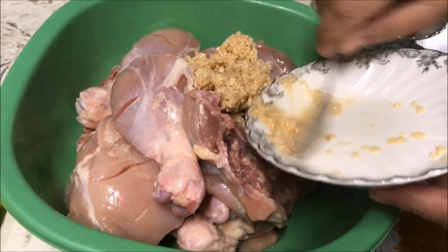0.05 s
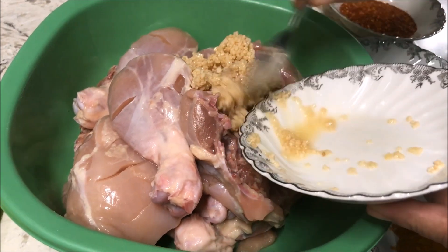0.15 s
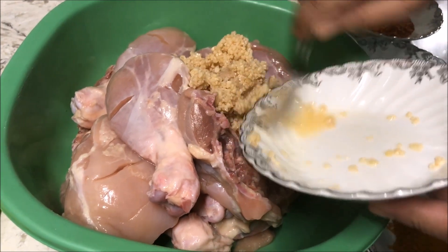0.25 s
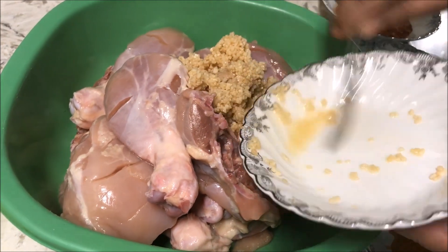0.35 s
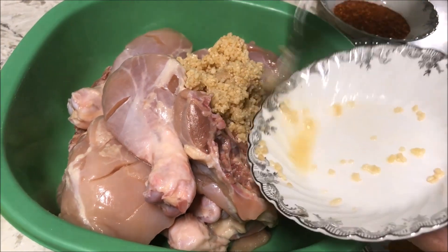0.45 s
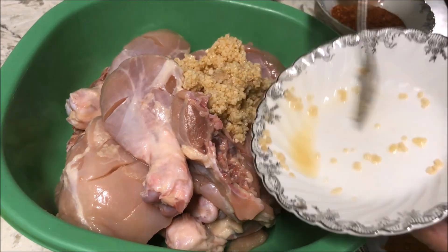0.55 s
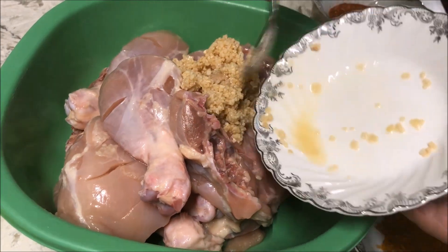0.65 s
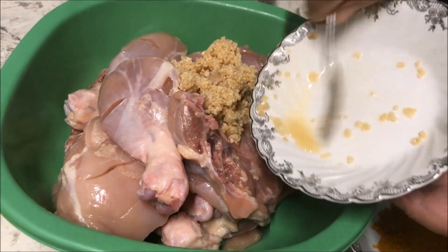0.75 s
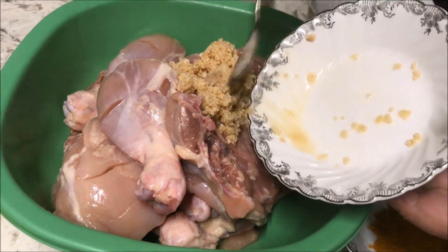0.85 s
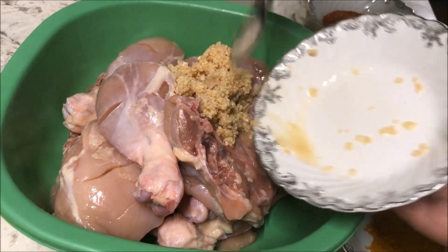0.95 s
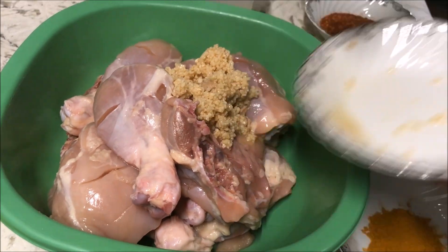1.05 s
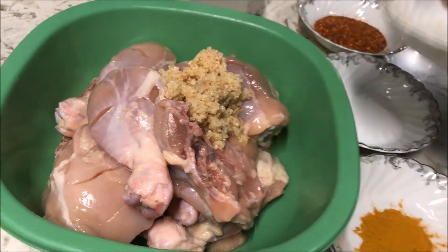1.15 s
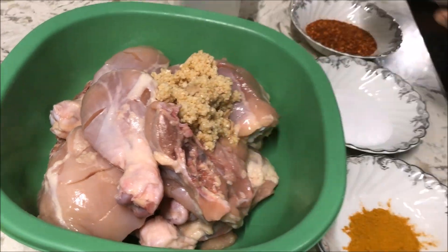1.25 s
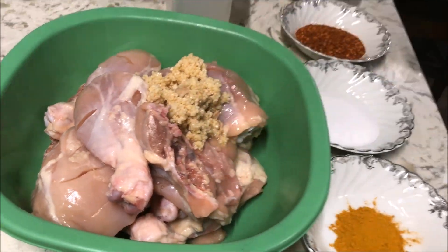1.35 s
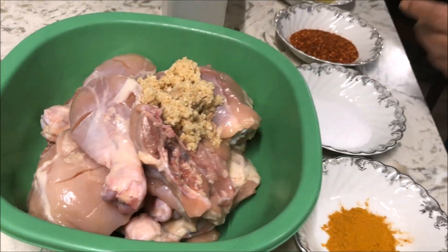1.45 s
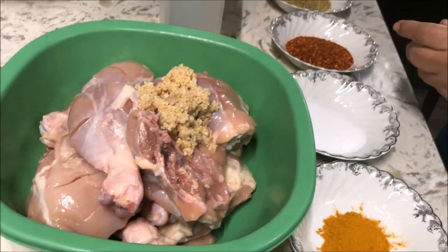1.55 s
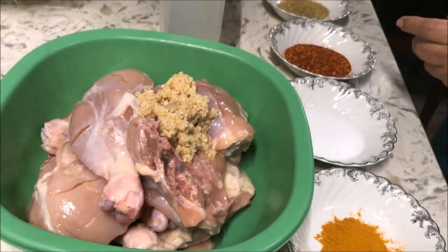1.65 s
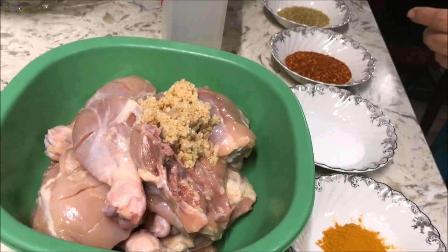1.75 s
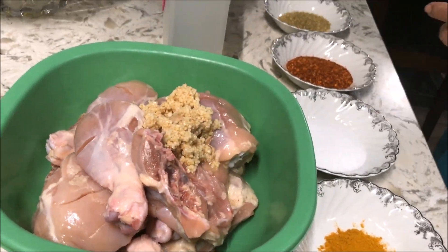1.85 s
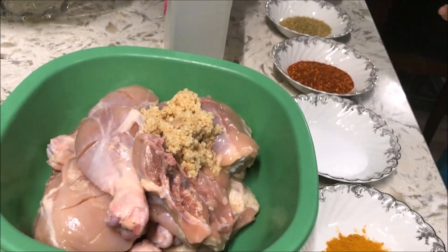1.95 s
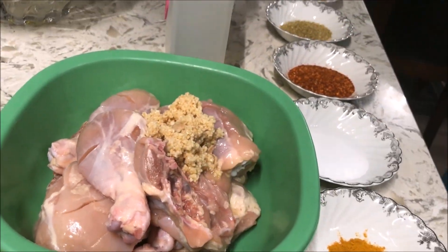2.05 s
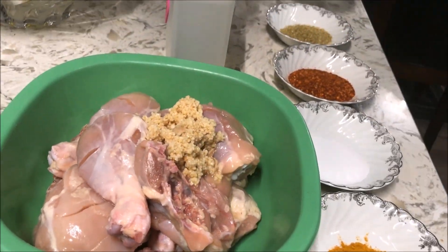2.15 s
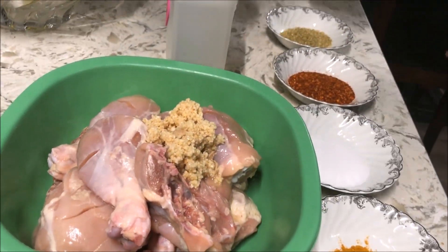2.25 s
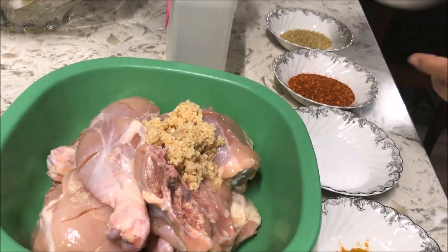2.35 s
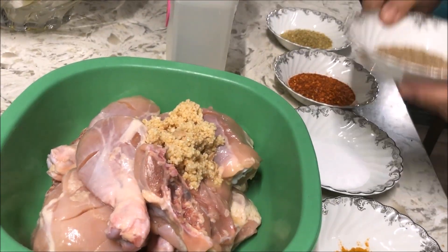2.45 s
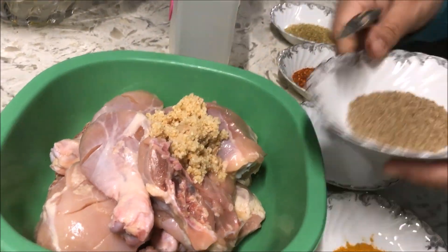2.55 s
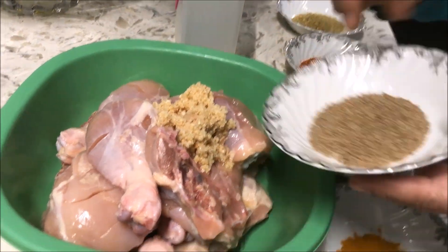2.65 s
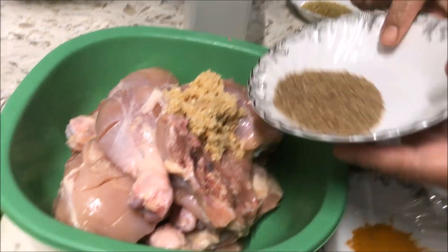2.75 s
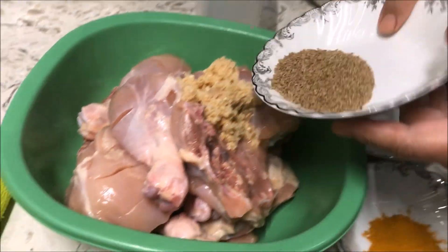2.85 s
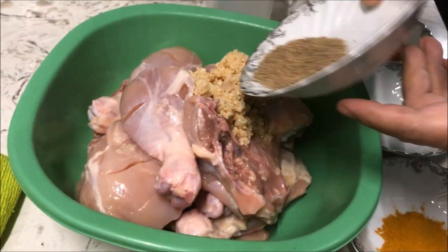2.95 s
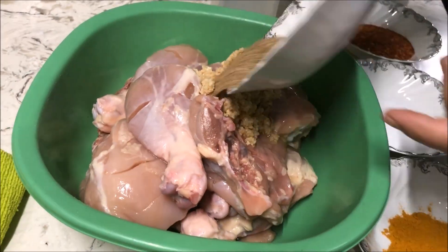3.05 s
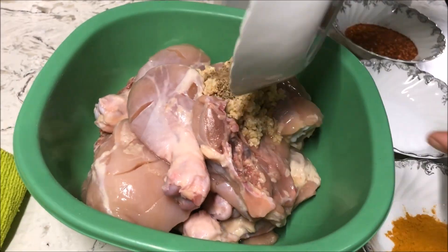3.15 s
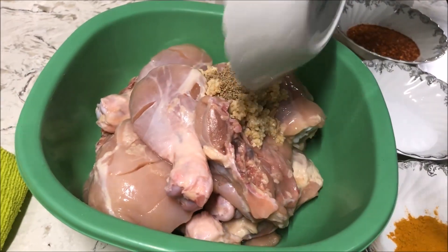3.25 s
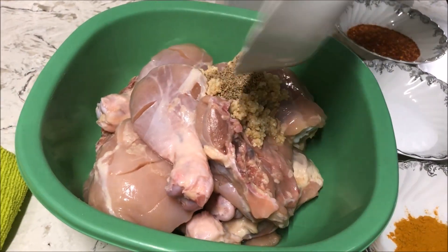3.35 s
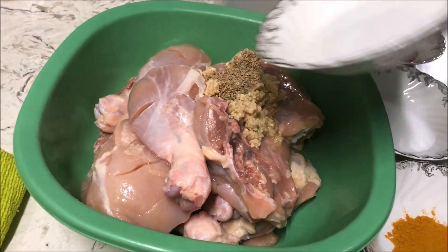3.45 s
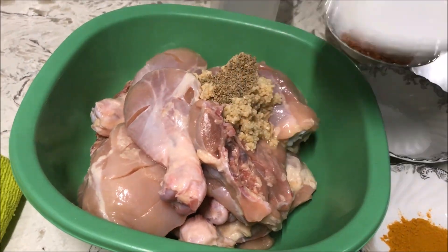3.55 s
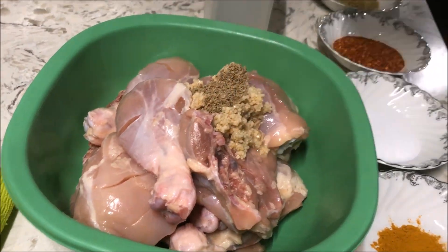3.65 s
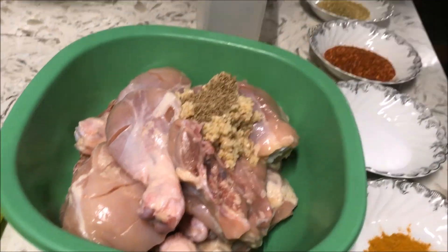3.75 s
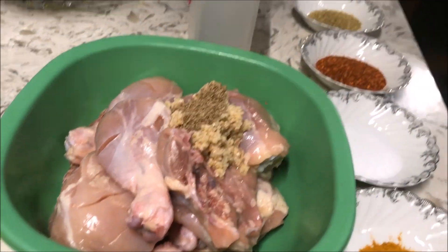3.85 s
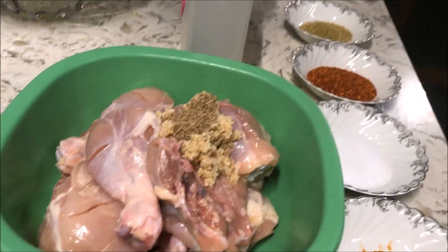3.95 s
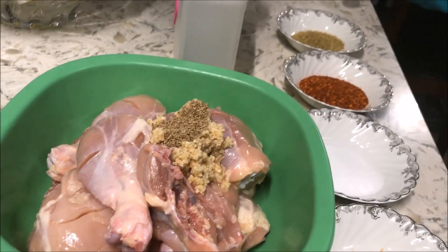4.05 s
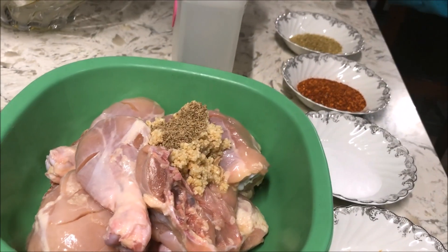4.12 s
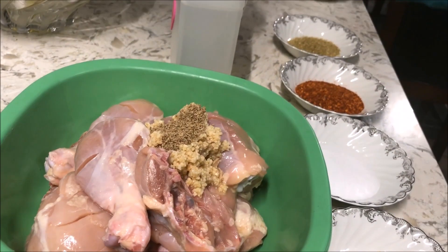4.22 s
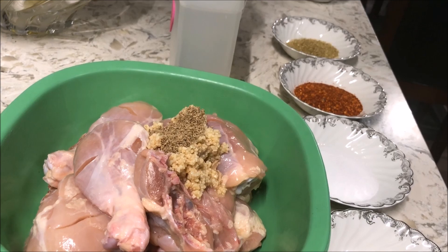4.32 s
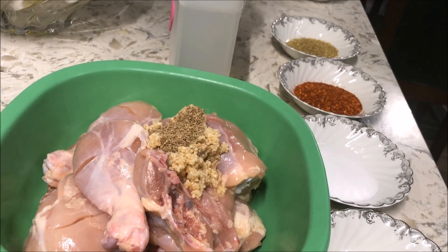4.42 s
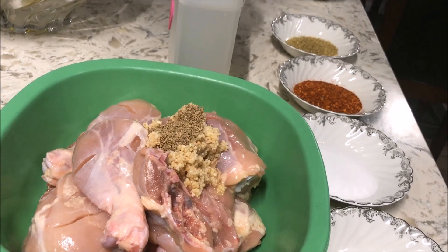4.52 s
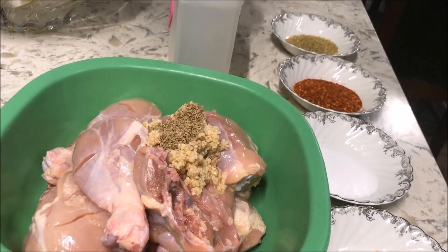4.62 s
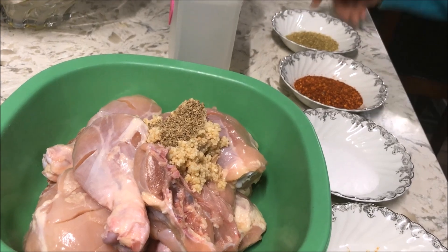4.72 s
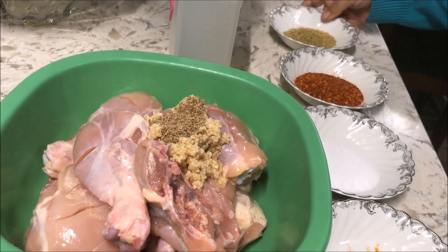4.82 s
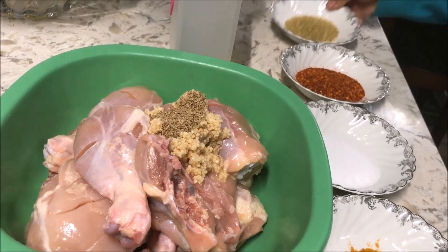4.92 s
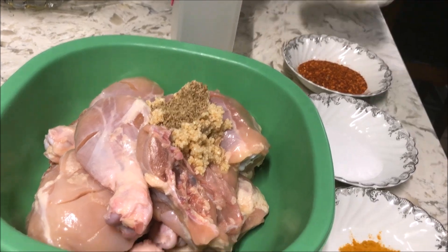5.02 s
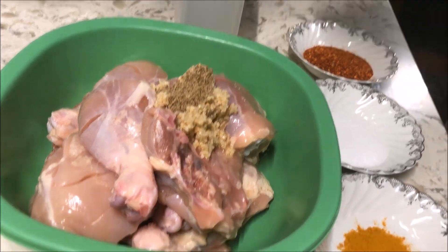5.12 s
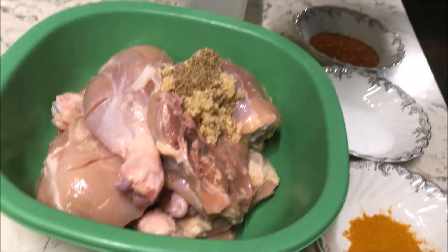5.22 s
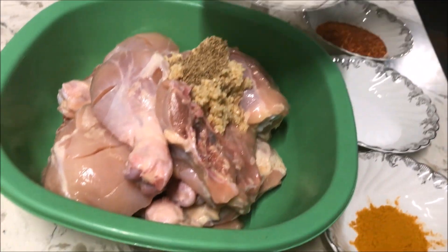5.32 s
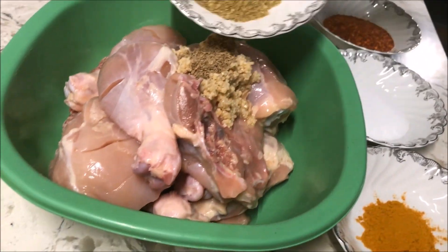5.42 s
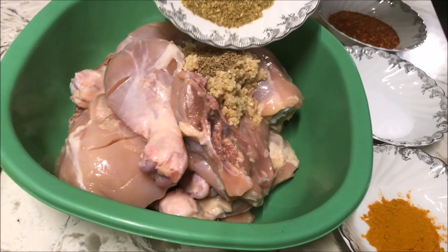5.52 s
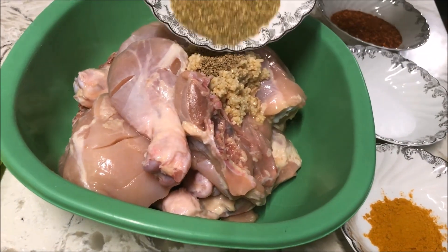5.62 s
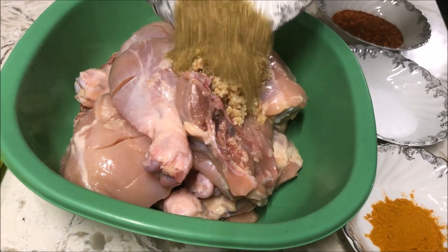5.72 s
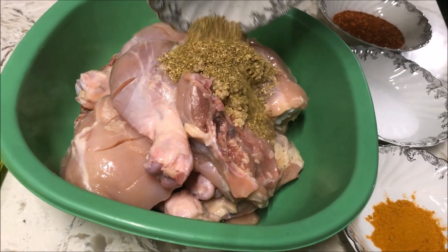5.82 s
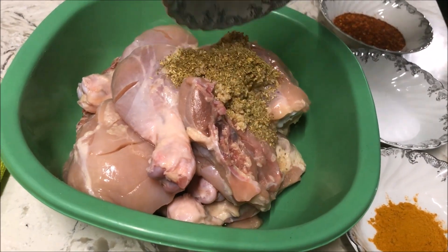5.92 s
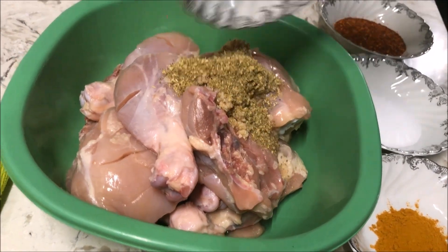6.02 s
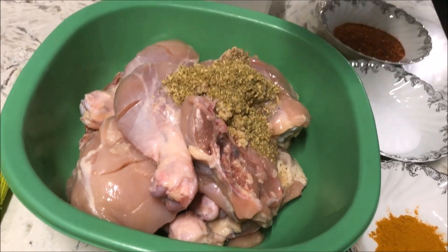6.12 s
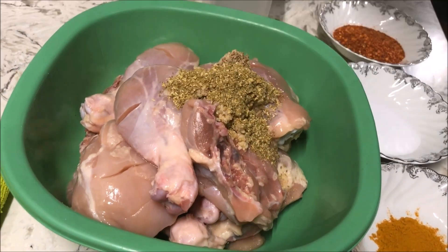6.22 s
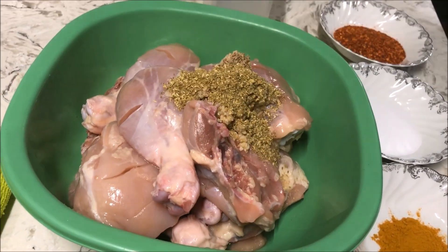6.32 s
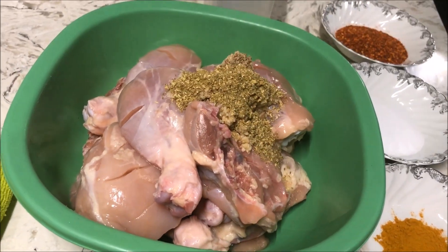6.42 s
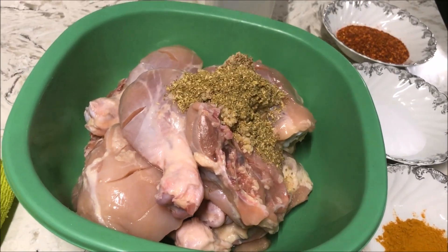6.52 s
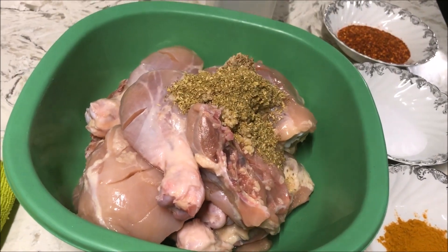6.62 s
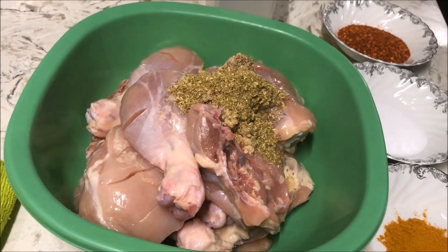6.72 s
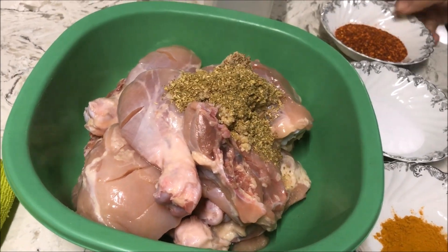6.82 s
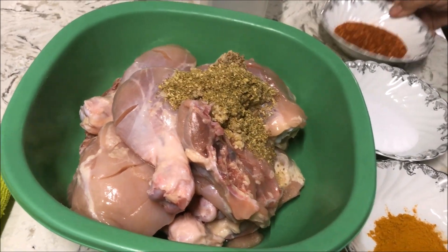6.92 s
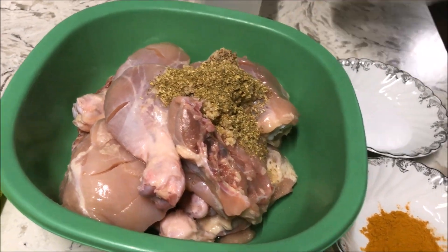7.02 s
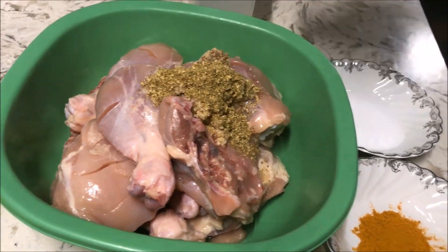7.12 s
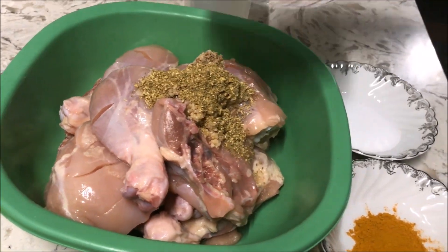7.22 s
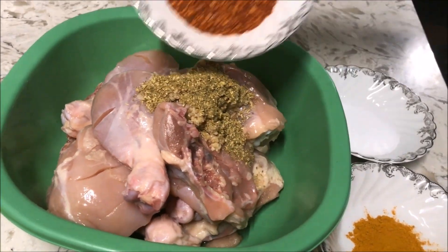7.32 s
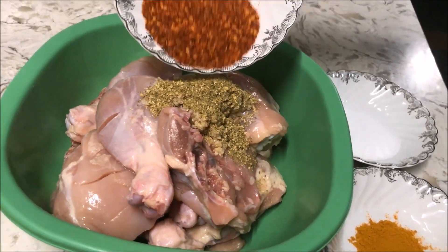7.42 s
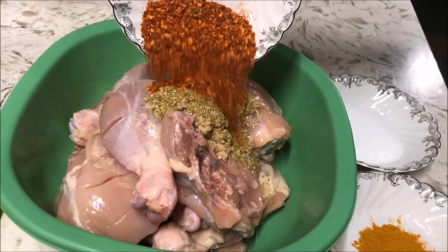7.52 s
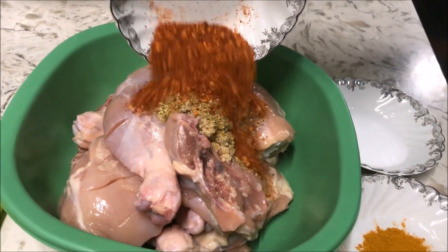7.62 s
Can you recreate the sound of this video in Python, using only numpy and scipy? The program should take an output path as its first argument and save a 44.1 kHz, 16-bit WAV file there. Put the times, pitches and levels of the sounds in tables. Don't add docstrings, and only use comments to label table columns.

```python
import sys
import numpy as np
from scipy import signal
from scipy.fft import rfft, irfft, next_fast_len
from scipy.io import wavfile
from scipy.ndimage import uniform_filter1d

SR = 44100
rng = np.random.default_rng(int(sys.argv[2]) if len(sys.argv) > 2 else 0)


def attenuation_scalar(level_db):
    decades = np.asarray(level_db, float) / 20
    return 10 ** decades


def wrap_up_sound(samples):
    columns = np.atleast_2d(samples).T
    tamed = np.clip(columns, -1, 1)
    steps = np.round(tamed * 32767).astype(np.int16)
    wavfile.write(sys.argv[1], SR, steps)


N = 338247
LONG = 8192

# frequency in Hz,
# level in dB, t60 in seconds.
RIMS = [
    [(2029, 0, .13), (4190, 0, .17), (6766, -2, .12), (9888, 0, .075), (13570, -1, .07), (9925, -8, .07)],
    [(1890, 0, .05), (4750, -3, .08), (6721, -5, .08), (9836, -3, .08), (2832, -9, .05), (10060, -7, .05)],
    [(3965, 6, .12), (6450, -4, .14), (4883, -12, .03), (9559, -2, .09), (13187, -8, .06), (9779, -4, .09)],
    [(4010, -3, .05), (6590, -2, .13), (3450, -8, .04), (9680, 0, .08), (13300, -2, .08), (9800, -6, .07)],
    [(4255, 7, .09), (6802, -2, .1), (4174, 3, .07), (10088, 0, .08), (13500, -12, .06), (10250, -10, .07)],
]
# frequency in Hz, level in dB, t60 in seconds.
FLOOR_RING = [(7750, -7, .04), (7838, -3, .07), (7915, -2, .11), (8040, 0, .06)]
HIGH_RING = [(12870, -6, .045), (13130, 0, .085), (13300, -3, .06)]
# frequency in Hz, level in dB, t60 in seconds.
WORKTOP_MODES = [(186, 6, 0.15), (298, 26, 0.043), (401.6, 6, 0.16), (520, -13, 0.033), (738, 6, 0.14),
                 (1110, 17, 0.025)]
# frequency in Hz, level in dB.
KNOCK = [(400, -31.5), (1000, -10), (1600, -3.5), (2600, 3), (4500, -10), (7000, -15.5), (12000, -18.5)]
TICK = [(1500, -38.5), (4000, -13.5), (7000, 3), (10000, 1), (13500, -3), (15000, -3.5), (16500, -22.5)]
THUD = [(150, -31.5), (450, 5), (1000, 2), (1600, 7.5), (2600, 10), (4500, 0), (7000, -8.5), (12000, -45)]
# start in seconds, dull knock peak in dB, floor ring in dB, high floor ring in dB.
FLOOR_TAPS = [(.0505, -48, -40, -42), (0.0638, -18.5, -12.5, -14), (0.1386, -15.5, -13.5, -25),
              (.2865, -39.5, -36, -45), (0.293, -13.5, -10.5, -10.5), (0.329, -24, -20, -25),
              (0.354, -47, -22.5, -27), (.4363, -50.5, -38, -42.5), (0.4498, -16, -7, -12),
              (0.4935, -23, -24, -41.5), (0.63, -14, -13, -12), (0.6366, -23.5, -30, -18),
              (.8174, -54.5, -38.5, -49), (0.83, -14.5, -7.5, -15.5), (0.838, -16.5, -39.5, -23.5),
              (0.8593, -12, -15, -35.5), (.9885, -49.5, -39.5, -50), (1.0015, -16, -5.5, -35),
              (1.028, -31.5, -31, -26), (1.248, -36.5, -50, -74)]


def evened(x):
    return x / np.sqrt(np.mean(x ** 2) + 1e-20)


def read(points, hz):
    f, value = np.transpose(points)
    return np.interp(np.log(hz + 1), np.log(f + 1), value)


def add(mix, s, sound):
    part = mix[round(s * SR):][:len(sound)]
    part += sound[:len(part)]


def coloured(x, points):
    gain = attenuation_scalar(read(points, np.fft.rfftfreq(len(x), 1 / SR)))
    return evened(irfft(rfft(x) * gain, len(x)))


def thinned(x, hz):
    return signal.sosfilt(signal.butter(2, hz, "high", fs=SR, output="sos"), x)


def resonate(x, hz, width):
    turn = np.exp(2j * np.pi * np.cumsum(hz * np.ones(len(x))) / SR)
    r = np.exp(-np.pi * width / SR)
    return 2 * (turn * signal.lfilter([1 - r], [1, -r], x / turn + 1e-18)).real


def ring(modes, spread_db=3.5, scatter=0.45):
    hz, db, t60 = np.transpose(modes)[:, :, None]
    t = np.arange(LONG) / SR
    lean, phase = rng.random((2, len(modes), 1))
    turn = 2j * np.pi * hz - np.log(1000) / t60
    fine, coarse = np.exp(turn * t[:128]), np.exp(turn * t[::128])
    whole = (fine[:, None] * coarse[:, :, None]).reshape(len(modes), -1)
    level = attenuation_scalar(db + spread_db * (2 * lean - 2.5))
    return (level * np.exp(2j * np.pi * scatter * phase) * whole).imag.sum(0)


def burst(points, t60, rise, grainy=0.):
    t = np.arange(LONG) / SR
    crumbs = attenuation_scalar(grainy * evened(uniform_filter1d(rng.standard_normal(len(t)), 40)))
    noise = coloured(rng.standard_normal(len(t)), points)
    return noise * crumbs * attenuation_scalar(-60 * t / t60) * (1 - np.exp(-t / rise))


def grit(size, per_s, spread_db):
    heights = attenuation_scalar(spread_db * np.minimum(rng.exponential(1, size), 4)) * rng.standard_normal(size)
    return evened(heights * (rng.random(size) < per_s / SR))


def hum(hz, width, noise):
    tone = np.sqrt(2) * np.sin(2 * np.pi * hz * np.arange(N) / SR)
    return evened(tone + .55 * evened(resonate(resonate(noise, hz, width), hz, width)))


def kitchen():
    # frequency in Hz, level in dB per Hz.
    hiss = [(15, -66.5), (25, -40.5), (92, -13.5), (229, -9), (285, -14), (714, -17), (1890, -28),
            (15500, -37)]
    # frequency in Hz, wavering width in Hz, level in dB.
    appliances = [(106, 10, -86), (208.2, 2, -70), (240.2, 9, -67), (306, 3.7, -79.5), (412, 5.2, -79.5)]
    # time in seconds, motor tone in dB, handling rumble in dB.
    swells = [
        (0.0, -67, -77),
        (2.8, -90, -75),
        (6.02, -61, -66),
        (6.689, -66.5, -60),
        (7.67, -73, -82),
    ]
    noise = rng.standard_normal(next_fast_len(N))
    other = noise[-N:][::-1]
    t = np.arange(N) / SR
    s, motor_db, rumble_db = np.transpose(swells)
    out = attenuation_scalar(-66) * coloured(noise, hiss)[:N]
    out += sum(attenuation_scalar(db) * hum(hz, width, noise[:N]) for hz, width, db in appliances)
    out += attenuation_scalar(np.interp(t, s, motor_db)) * hum(139.7, 24, other)
    rumble = evened(resonate(resonate(other, 400, 300), 400, 300))
    return out + attenuation_scalar(np.interp(t, s, rumble_db) - 8.0) * rumble


def room(x):
    # frequency in Hz, t60 in seconds.
    decay = [(300, 0.46), (1000, 0.28), (3000, 0.24), (8000, 0.23), (15000, 0.23)]
    taps = np.zeros(SR // 2)
    at = np.arange(200, SR // 2 - 20, 20)
    taps[at + rng.integers(0, 20, len(at))] = rng.choice([-1., 1.], len(at))
    hz, t, z = signal.stft(taps, SR, nperseg=256)
    tail = signal.istft(z * attenuation_scalar(-60 * t / read(decay, hz)[:, None]), SR, nperseg=256)[1]
    return signal.fftconvolve(x, tail / np.linalg.norm(tail))[:N]


def seeds():
    # fastest at in seconds, half length in seconds, floor ring in dB, high floor ring in dB.
    slides = [
        (2.785, 0.087, -68.5, -65),
        (2.977, 0.13, -83.5, -71.5),
        (3.187, 0.12, -80.5, -71),
        (5.46, .09, -85, -75),
        (5.68, 0.058, -76, -93),
        (7.476, 0.13, -69.5, -70),
    ]
    # loudest at in seconds, half length in seconds, level in dB.
    rustles = [
        (2.705, 0.037, -63),
        (2.893, 0.097, -93),
        (3.19, 0.17, -82.5),
        (3.52, 0.08, -79.5),
        (3.796, .08, -62),
        (5.46, 0.14, -72.5),
        (5.948, 1, -75),
        (7.278, 0.15, -70),
        (7.56, 0.055, -63.5),
    ]
    ticks = grit(next_fast_len(N), 2500, 1.7)
    t = np.arange(0, len(ticks), 64) / SR

    def swell(rows):
        gain = sum(attenuation_scalar(db - 13.5 * abs(t - s) / half) for s, half, db in rows)
        return np.repeat(gain, 64)[:N]

    out = swell(rustles) * (coloured(ticks, THUD) + 0.23 * coloured(ticks, TICK))[:N]
    s, half, floor_db, high_db = np.transpose(slides)
    for db, modes in (floor_db, FLOOR_RING), (high_db, HIGH_RING):
        singing = evened(signal.oaconvolve(ticks, ring(modes, 1.9))[:N])
        out += swell(zip(s, half, db)) * singing
    return out


def touches():
    # start in seconds, dull peak in dB, bright peak in dB, pitch in Hz.
    short_touches = [(2.039, -46, -64, 2375), (2.452, -58, -87, 2270), (2.725, -62, -63, 5200),
                     (2.873, -69.5, -67, 3500), (2.844, -59.5, -61.5, 920), (2.919, -56, -55.5, 4030),
                     (3.28, -48, -55.5, 4140), (3.445, -56.5, -88, 4170), (3.489, -57.5, -61.5, 4030),
                     (3.686, -49, -49.5, 4140), (3.741, -52.5, -62, 1210), (3.786, -46.5, -62, 1620),
                     (3.945, -74.5, -57.5, 950), (4.351, -55, -76, 2780), (4.857, -55, -76, 1480),
                     (5.876, -50, -60, 3670), (6.071, -50, -58.5, 3420), (6.982, -36, -44.5, 4250),
                     (7.224, -56.5, -53, 3770), (7.252, -55, -57, 2110), (7.449, -62.5, -59.5, 3610),
                     (7.52, -46.5, -49, 3500)]
    sweeps = [
        (4.007, -44, -54, 2050),
        (6.089, -51, -64.5, 1820),
        (6.258, -50, -62, 2880),
        (6.307, -33.5, -48, 3720),
        (6.987, -44, -45.5, 3980),
    ]
    # start in seconds, dull peak in dB, pitch in Hz.
    patter = [
        (5.462, -54, 902),
        (5.587, -51.5, 1110),
        (5.624, -49, 870),
        (5.649, -51.5, 1990),
        (5.703, -53, 2030),
        (5.756, -55, 920),
        (5.776, -51.5, 900),
        (5.797, -52, 890),
    ]
    # start in seconds, level in dB.
    bumps = [
        (1.186, -64),
        (1.511, -65),
        (1.868, -49),
        (5.801, -55.5),
        (6.265, -47),
        (6.83, -55.5),
    ]
    rows = [(s, dull, bright, hz, 0.043 + 0.017 * hz / 1e3) for s, dull, bright, hz in short_touches]
    rows += [(*row, 0.2) for row in sweeps]
    rows += [(s, db, db - 40, hz, 0.029) for s, db, hz in patter]
    out = np.zeros(N)
    soft_start = np.minimum(np.arange(LONG) / (.006 * SR), 1)
    for s, db in bumps:
        add(out, s, attenuation_scalar(db) * ring(WORKTOP_MODES[2:4], 1.5) * soft_start)
    for s, dull_db, bright_db, hz, t60 in rows:
        pitched = [(hz / 0.91, -30), (hz / 1.15, -6), (hz, 0), (hz * 1.0, -6), (hz * 2.8, -30)]
        push = burst(THUD, t60, 0.048 * t60, 3.1) + .9 * burst(pitched, .6 * t60, 0.02 * t60, 3.)
        puff = burst(TICK, t60, 0.011 * t60, 2.7)
        add(out, s, attenuation_scalar(dull_db - 4) * push)
        add(out, s, attenuation_scalar(bright_db - 1.0) * puff + attenuation_scalar(dull_db - 21.5) * ring(WORKTOP_MODES, 9.2))
    return out


def struck():
    # start in seconds, dull knock peak in dB, floor ring in dB, high floor ring in dB, upper
    # rim ring in dB.
    rim_taps = [(0.001, -53.5, -43.5, -49, -46.5), (0.127, -14, -9.5, -21, -21.5),
                (0.159, -37, -9.5, -15.5, -14), (0.184, -19.5, -15, -18.5, -13),
                (0.513, -16.5, -15, -16.5, -10.5), (0.518, -25, -28, -37.5, -13.5),
                (0.528, -19, -18, -23, -16), (0.669, -13, -8.5, -13.5, -22.5), (0.676, -24, -6, -19.5, -12),
                (0.69, -15, -18, -15.5, -31), (0.7, -38.5, -8.5, -25.5, -13.5),
                (0.7131, -22.5, -20, -17, -17.5), (0.907, -25.5, -18, -27, -10.5),
                (1.002, -40, -50, -49.5, -12.5)]
    # start in seconds, thud peak in dB,
    # floor ring in dB, upper rim ring in dB, lower rim ring in dB.
    stacked = [
        (1.718, -10, -24.5, -20.5, -52),
        (1.723, -13.5, -16, -39.5, -47),
        (1.761, -16, -33.5, -36.5, -38),
        (1.768, -21.5, -43, -50, -42),
        (1.776, -15, -25.5, -29.5, -29),
        (1.849, -15, -35, -54.5, -31),
        (1.855, -26, -36, -32, -41),
        (1.862, -26.5, -38.5, -32, -47),
        (2.141, -7.5, -36, -36.5, -30),
        (2.148, -17, -43, -44, -51.5),
    ]
    tipped = [(2.625, -75, -80, -64, -70), (2.649, -75, -80, -72, -74), (2.676, -57, -72, -59, -61),
              (4.088, -4.5, -29, -66.5, -42.5), (4.101, -12, -40.5, -76, -50.5),
              (4.111, -18.5, -51, -69.5, -65), (4.233, -18.5, -66, -69, -74), (4.926, -19.5, -70, -58, -38),
              (4.962, -13, -32, -29.5, -31.5), (5.009, -19.5, -42, -29, -28),
              (5.016, -21.5, -33.5, -23.5, -41), (5.036, -17, -64.5, -44, -46),
              (6.579, -4.5, -21.5, -38, -34), (6.5945, -10, -37, -52, -45.5), (6.6, -23, -54, -60, -45.5),
              (6.667, -9, -60, -72, -29.5)]
    nudged = [
        (4.54, -21.5, -24, -51, -42),
        (4.56, -24.5, -56, -37.5, -65),
        (4.632, -22.5, -61.5, -27.5, -51),
        (4.654, -46, -76, -31, -30),
        (4.683, -42, -46, -36, -35),
        (4.698, -31, -60, -64, -56),
    ]
    lifted = [
        (6.909, -29, -66, -60, -57),
        (6.913, -19.5, -71, -48, -49),
        (6.92, -20, -76, -49, -39),
        (6.978, -21.5, -46.5, -56, -53),
    ]
    floor_to_high_db = [-9, -2, -10, 7]
    rows = [(0, s, k, f, h, k - 27.5, k - 34.5) for s, k, f, h in FLOOR_TAPS]
    rows += [(0, s, k, f, h, u, u - 25) for s, k, f, h, u in rim_taps]
    for dish, table in enumerate([stacked, tipped, nudged, lifted]):
        rows += [(dish + 1, s, k, f, f + floor_to_high_db[dish], u, low) for s, k, f, u, low in table]
    return rows


def drained(s, share):
    # from in seconds, to in seconds, loss in dB per s.
    held = [(0.084, 0.192, 1501), (0.298, .4, 1496), (0.476, 0.532, 1502), (0.637, 0.717, 1503),
            (0.846, 0.911, 1514), (1.686, 1.896, 596), (4.564, 4.704, 799), (4.96, 5.046, 493),
            (6.585, 6.664, 987), (4.096, 4.235, 290), (6.985, 7.0, 3004), (5.09, 5.196, 250)]
    t = s + np.arange(LONG) / SR
    loss_db = sum(rate * (np.clip(t, a, b) - np.clip(s, a, b)) for a, b, rate in held)
    return attenuation_scalar(-share * loss_db)


def china(dish, s, floor_db, high_db, upper_db, lower_db):
    # frequency in Hz, level in dB, t60 in seconds.
    floors = [
        FLOOR_RING,
        [(7936, 0, .09), (7889, -7, .07), (8240, -6, .04)],
        [(7980, 0, .07), (7870, -4, .07), (7714, -6, .02)],
        [(7960, 0, .1), (7917, -2, .05), (8039, -2, .05)],
        FLOOR_RING,
    ]
    rim, left = RIMS[dish], drained(s, 0.81)
    floor = attenuation_scalar(floor_db + 2.0) * ring(floors[dish]) + attenuation_scalar(high_db + 3.5) * ring(HIGH_RING)
    wall = attenuation_scalar(upper_db + 2.5) * ring(rim[2:], 2.5) + attenuation_scalar(lower_db - 3) * ring(rim[:2], 0.93)
    tick_level = attenuation_scalar(floor_db - 10.5) + attenuation_scalar(high_db - 8.5) + attenuation_scalar(upper_db - 1.0)
    return floor * left ** 2.1 + wall * left ** 0.67 + tick_level * burst(TICK, 0.008, .00008)


def friction(strokes, body, per_s, width, broad, climb_hz, floor_db, rim_db, rim_db_per_octave):
    out = np.zeros(N)
    pressed = attenuation_scalar(-900 * np.arange(LONG) / SR)
    blows = struck()
    for s, end, first_db, last_db, middle_hz in strokes:
        t = np.arange(s, end + .004, 1 / SR)
        grind = attenuation_scalar(np.interp(t, [s, end], [first_db, last_db]))
        hz = middle_hz + climb_hz * (t - (s + end) / 2)
        slips = grit(len(t), per_s, 3.) * signal.windows.tukey(len(t), .1)
        rim = RIMS[min(blows, key=lambda row: abs(row[1] - s))[0]]
        chatter = sum(attenuation_scalar(db - 9.5 - 549 * abs(t - at)) * (t > at) for at, _, db, _ in FLOOR_TAPS)
        squeak = evened(resonate(resonate(slips, hz, width), hz, width))
        scratch = coloured(slips, body) + .5 * coloured(slips, TICK)
        add(out, s, grind * attenuation_scalar(-4.0) * (squeak + broad * scratch))
        floor = pressed * (0.074 * ring(FLOOR_RING) + .04 * ring(HIGH_RING))
        add(out, s, signal.fftconvolve((grind * attenuation_scalar(floor_db) + chatter) * slips, floor))
        shake = grind * attenuation_scalar(rim_db + rim_db_per_octave * np.log2(hz / 3500))
        add(out, s, signal.fftconvolve(shake * slips, pressed * 0.32 * ring(rim[2:])))
    return out


def dish_landings():
    # frequency in Hz, level in dB.
    crack = [(500, -22), (1000, -8), (1450, 8.5), (2600, 5), (4500, 7.5), (6500, -10), (12000, -42)]
    # frequency in Hz, level in dB, t60 in seconds.
    clank = [(1100, -3, .05), (1450, 0, .03), (1870, -3, .025), (2400, -2, .02), (2600, 0, .025),
             (2900, -2, .035), (3150, 0, .025), (3950, -2, .02), (4550, 1, .02), (5550, -8, .012)]
    out = np.zeros(N)
    for dish, s, knock_db, *ring_dbs in struck():
        if dish == 0:
            continue
        sound = attenuation_scalar(knock_db - 16) * burst(THUD, 0.047, 0.00054, 1.6)
        sound += attenuation_scalar(knock_db - 40) * ring(WORKTOP_MODES, 3.8, 0.98)
        sound += attenuation_scalar(knock_db - 11) * burst(crack, 0.016, 0.00025)
        sound = thinned(sound, 850) + attenuation_scalar(knock_db - 18) * ring(clank, 3.4, 0.68)
        add(out, s, sound + china(dish, s, *ring_dbs))
    return out


def worktop():
    # from in seconds, to in seconds,
    # grind in dB at start, grind in dB at end, contact resonance in Hz.
    drags = [(1.725, 1.755, -28.5, -52.5, 2430), (1.764, 1.8, -27, -42, 1820),
             (1.803, 1.862, -44.5, -38, 1840), (1.866, 1.92, -41, -60.5, 520),
             (4.6, 4.655, -67.5, -40, 2850), (4.657, 4.74, -49, -63.5, 3450),
             (4.885, 4.945, -58.5, -50, 1430), (5.012, 5.04, -23.5, -56, 4680),
             (5.042, 5.07, -64, -58, 2000), (6.598, 6.65, -38, -84.5, 2750), (6.905, 6.94, -55, -65, 2500)]
    chatter = friction(drags, THUD, per_s=3000, width=560, broad=1.0, climb_hz=0,
                       floor_db=-2.5, rim_db=-14, rim_db_per_octave=10)
    return thinned(dish_landings() + chatter + touches() + seeds(), 110)


def bending():
    # split in Hz, share of the partner.
    splits = [(15, .85), (9.5, .6)]
    # start in seconds, lowest mode in dB, second mode in dB.
    bends = [(.126, -50, -36), (.183, -46, -32), (.293, -45.5, -48.5), (.5136, -40.5, -40),
             (.528, -26, -26), (.63, -40, -50.5), (.6693, -19.5, -30.5), (.7135, -27, -38),
             (.842, -30, -44.5), (.9072, -25.5, -37), (1.0015, -25, -32.5)]
    out, t = np.zeros(N), np.arange(LONG) / SR
    for s, *levels_db in bends:
        for db, (hz, _, t60), (split, share) in zip(levels_db, RIMS[0], splits):
            lower = np.sin(2 * np.pi * (hz - split / 2) * t)
            upper = np.sin(2 * np.pi * (hz + split / 2) * t)
            add(out, s, attenuation_scalar(db - 60 * t / t60) * (lower - share * upper) * drained(s, .3))
    return out


def spoon_taps():
    out = np.zeros(N)
    for dish, s, knock_db, *ring_dbs in struck():
        if dish == 0:
            knock = attenuation_scalar(knock_db - 4) * burst(KNOCK, 0.021, 0.0001)
            add(out, s, knock + china(dish, s, *ring_dbs))
    return out


def spoon():
    # from in seconds, to in seconds, grind in dB at start, grind in dB at end, contact
    # resonance in Hz.
    scrapes = [(0, .058, -56.5, -56, 3000), (.072, .104, -37.5, -43.5, 2400),
               (.108, .123, -42.5, -35.5, 3700), (.143, .18, -33, -30.5, 4900),
               (.3, .326, -47, -33.5, 3100), (.33, .365, -32.5, -38.5, 4800), (.453, .464, -32, -33, 3000),
               (.467, .49, -38, -36, 3350), (.492, .511, -30, -34, 3300), (.638, .66, -39.5, -35, 3000),
               (.664, .712, -27, -32, 3800), (.842, .88, -33.5, -41.5, 3300),
               (.883, .903, -34, -32.5, 5300), (1.008, 1.032, -34.5, -37.5, 4300)]
    squeak = friction(scrapes, KNOCK, per_s=3500, width=620, broad=0.45, climb_hz=9000,
                      floor_db=2.3, rim_db=-14, rim_db_per_octave=14)
    return thinned(spoon_taps() + bending() + squeak, 1300)


def scene():
    near, far = spoon(), worktop()
    echoes = room(attenuation_scalar(-13.5) * near + attenuation_scalar(-7.5) * far)
    return (near + far + echoes + kitchen())[None]


def roll_off(x):
    return signal.sosfilt(signal.butter(12, 16810, fs=SR, output="sos"), x)


def record(dry):
    edge = signal.firwin(127, 15900, window=("kaiser", 4), fs=SR)[None]
    squeezed = 1.15 * np.tanh(dry / 1.15)
    return roll_off(signal.oaconvolve(squeezed, edge, "same"))


dry = scene()
out = record(dry)
wrap_up_sound(out)
```